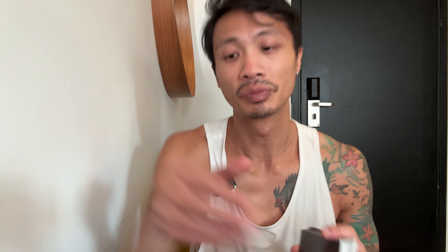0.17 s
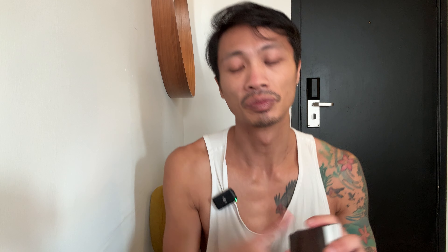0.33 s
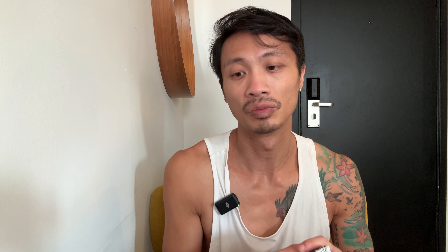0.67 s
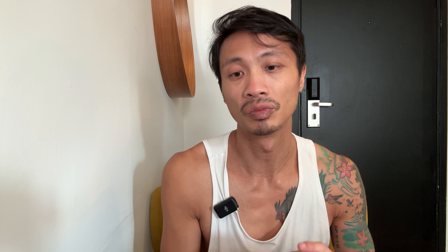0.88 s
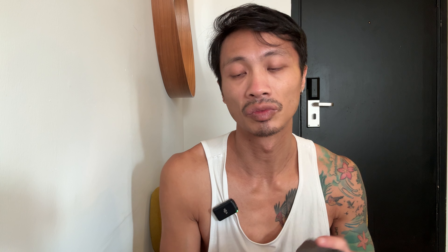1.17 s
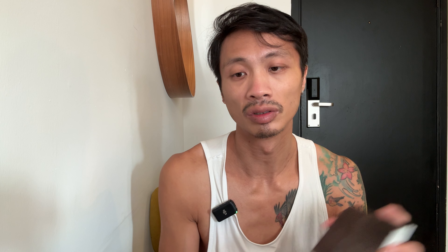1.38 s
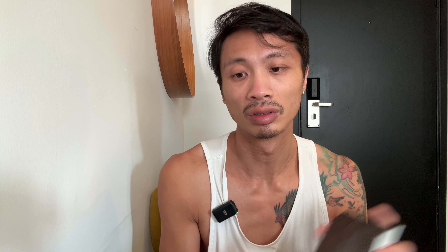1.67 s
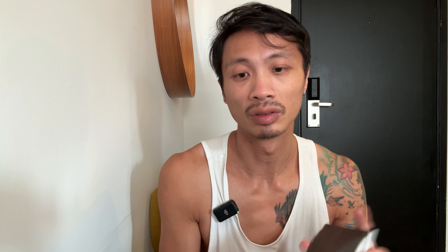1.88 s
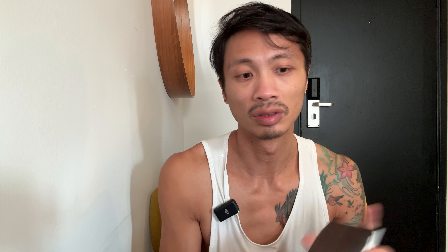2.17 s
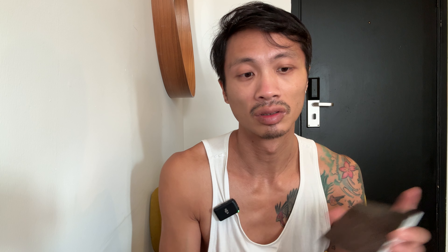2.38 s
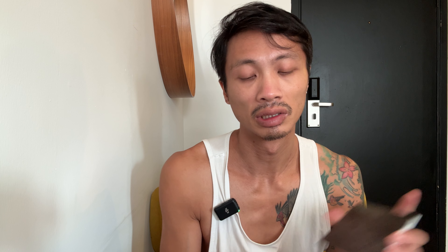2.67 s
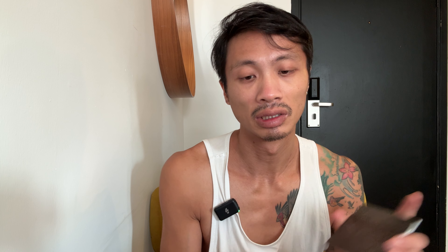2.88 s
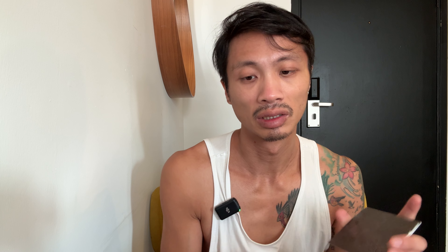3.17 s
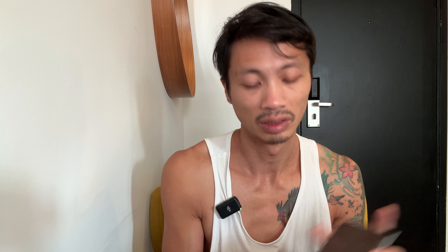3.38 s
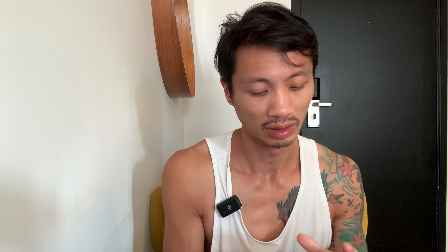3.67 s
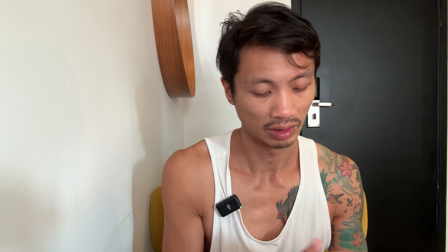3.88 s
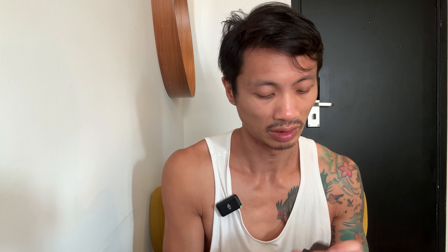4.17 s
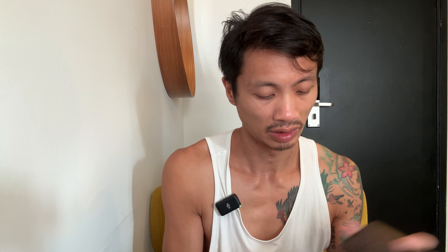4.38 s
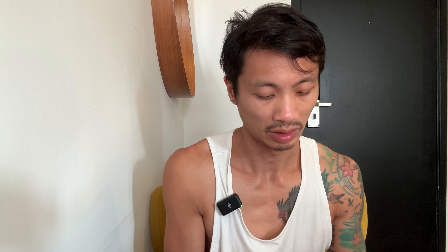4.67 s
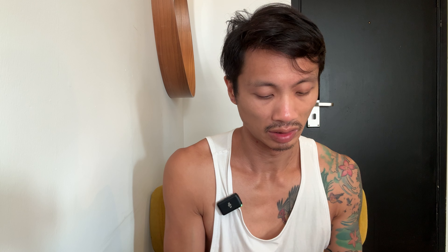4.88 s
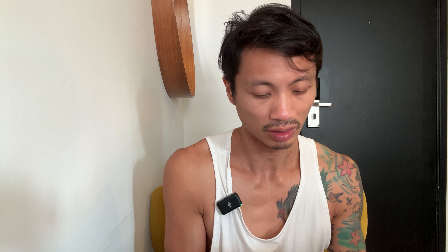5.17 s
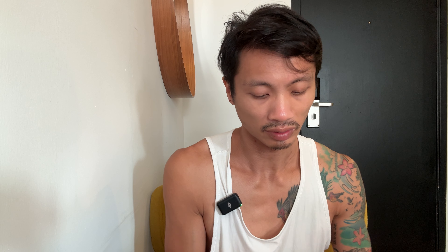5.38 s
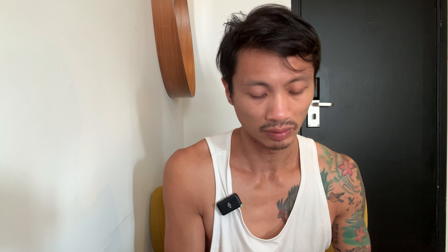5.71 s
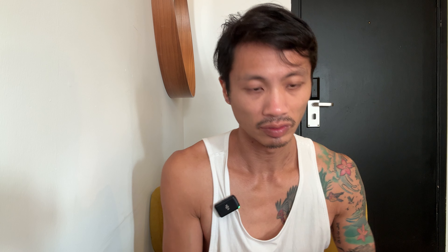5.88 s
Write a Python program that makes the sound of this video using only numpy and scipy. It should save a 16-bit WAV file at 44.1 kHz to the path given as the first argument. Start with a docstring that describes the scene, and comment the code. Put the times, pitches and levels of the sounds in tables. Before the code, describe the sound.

Playing cards rustle, slide and slap in a regular hand shuffle, pause, then crack sharply twice close by, with faint room hum underneath.

```python
"""A small quiet room, where a deck of stiff cards is picked up and shuffled from hand to hand.
Packets slide over each other with a papery hiss, made of filtered friction noise, and slap onto the deck.
Each slap is a puff of air, a ring of a few milliseconds from damped bending modes, and an edge tick.
A soft low bump comes first and two hard snaps near the end, over faint air noise, a hum and thin whines.
Near surfaces echo the snaps and slides, and a short diffuse tail follows them."""
import sys
import numpy as np
from scipy import signal
from scipy.fft import rfft, irfft
from scipy.io import wavfile
from scipy.ndimage import uniform_filter1d

SR = 44100
rng = np.random.default_rng(int(sys.argv[2]) if len(sys.argv) > 2 else 0)


def digitize_waveform(pressure):
    """Quantize a signal to 16-bit integers and store it at the path in sys.argv[1].

    Rows of a 2-D input are taken as channels; values are limited to [-1, 1].
    """
    field = np.atleast_2d(pressure).T
    bounded = np.clip(field, -1, 1)
    quanta = np.round(bounded * 32767).astype(np.int16)
    wavfile.write(sys.argv[1], SR, quanta)


N = 266540

# Shuffle strokes, each a packet peeled off the deck. Each row: start in seconds, length in seconds,
# edge hiss in dB, growth of the hiss over the stroke in dB, face rasp in dB before the overall rasp gain,
# resonance of the rubbed card in Hz.
STROKES = [(1.644, 0.074, -53.5, 3, -46.5, 2480), (1.952, 0.077, -51, 5, -47, 3100),
           (2.25, .056, -45.5, 6, -43, 1890), (2.54, 0.068, -49.5, -7, -50.5, 2100),
           (2.813, 0.073, -44.5, 0, -50, 3060), (3.096, 0.063, -47.5, -6, -49.5, 3055),
           (3.356, .072, -45, -8, -48.5, 1600), (3.632, .058, -69, -4, -55, 2470),
           (4.614, 0.04, -58, -13, -49.5, 2310)]


def amp(db):
    """The decibel law: 20 dB is a factor of ten in amplitude."""
    return 10 ** (np.asarray(db) / 20)


def evened(x):
    """Normalisation by mean power: scales to rms 1."""
    return x / np.sqrt(np.mean(x ** 2) + 1e-20)


def unit(x):
    """Normalisation by total energy: scales to energy 1."""
    return x / (np.linalg.norm(x) + 1e-12)


def read(points, hz):
    """Interpolation on a log-frequency axis, close to how pitch is heard."""
    f, value = np.transpose(points)
    return np.interp(np.log(hz + 1), np.log(f + 1), value)


def add(mix, s, sound):
    """Superposition: adds a sound to the mix in place from time s."""
    part = mix[max(round(s * SR), 0):][:len(sound)]
    part += sound[:len(part)]


def causal(points, size=2048):
    """Minimum phase: the Hilbert transform of the log spectrum gives the most compact causal response."""
    log_gain = np.log(amp(read(points, abs(np.fft.fftfreq(size, 1 / SR)))))
    spectrum = np.exp(np.conj(signal.hilbert(log_gain)))
    return np.fft.ifft(spectrum).real[:size // 2]


def through(x, response):
    """Linear filtering: convolves with an impulse response and keeps the length."""
    return signal.fftconvolve(x, response)[:len(x)]


def wander(per_s):
    """Low-passed noise: a smooth random course of rms 1 that changes about per_s times a second."""
    size = max(int(SR / per_s), 1)
    return evened(uniform_filter1d(uniform_filter1d(rng.standard_normal(N), size), size))


def air(noise_db=-56.5, hum_hz=141.5, hum_db=-62.0):
    """Stationary noise shaped by its spectrum, with a faint hum under random amplitude modulation."""
    # Spectrum of the background. Each row: frequency in Hz, relative level in dB.
    air_colour = [(15, -42), (25, -14.5), (40, -6), (62, -11), (105, -7), (160, -5.5), (240, -7),
                  (420, -17.5), (750, -20), (1170, -21.5), (1900, -36.5), (2900, -38), (5000, -46),
                  (8000, -47), (11000, -44.5), (16000, -50)]
    gain = amp(read(air_colour, np.fft.rfftfreq(N, 1 / SR)))
    noise = evened(irfft(rfft(rng.standard_normal(N)) * gain, N))
    hum = wander(5) * np.sin(2 * np.pi * hum_hz * np.arange(N) / SR)
    return amp(noise_db) * noise + amp(hum_db) * hum


def whines(waver=.012, blur_hz=300.):
    """Frequency modulation: thin high tones waver slowly, blur quickly, and fade in and out."""
    # Faint background tones. Each row: start in seconds, end in seconds, centre frequency in Hz, level in dB.
    whine_rows = [(0, 0.27, 4730, -78), (0.302, 1.3, 10960, -87), (3.931, 4.219, 11500, -88)]
    out = np.zeros(N)
    for start, end, hz, db in whine_rows:
        size = int((end - start) * SR)
        frequency = hz * (1 + waver * wander(18)) + blur_hz * wander(2500)
        turns = np.cumsum(frequency[:size]) / SR
        tone = signal.windows.tukey(size, .5) * np.sin(2 * np.pi * turns)
        add(out, start, amp(db) * evened(tone))
    return out


def friction(colour, grains_per_s, grain_share, uneven_db):
    """Stick-slip of paper fibres: a smooth rub plus tiny random clicks, under uneven pressure."""
    clicks = (rng.random(N) < grains_per_s / SR) * rng.standard_normal(N)
    rub = rng.standard_normal(N) + grain_share * evened(clicks)
    rub *= amp(uneven_db * wander(220))
    return evened(through(rub, causal(colour)))


def scrapes(t, swell_db=15, roundness=1.3):
    """Friction grows with speed: each scrape swells and dies away, as (hiss, rasp, resonance)."""
    # Loose scrapes as the cards are gathered and squared. Each row: peak time, rise and fall in seconds,
    # edge hiss in dB, face rasp in dB before the overall rasp gain, resonance of the rubbed card in Hz.
    scrape_rows = [(.135, .08, .12, -64, -66, 3380), (.535, 0.0059, .075, -58.5, -58, 1199),
                   (1.165, .07, .06, -74, -64, 1153), (1.293, .06, .045, -65, -53, 1240),
                   (1.355, .07, 0.016, -48.5, -59, 1248), (1.828, .008, .045, -65, -60, 1247),
                   (3.275, .012, .085, -69, -58, 3160), (3.962, .028, 0.025, -57, -56, 2617),
                   (4.25, .08, .17, -63.5, -65, 2600), (4.38, .08, .02, -50, -57.5, 2193),
                   (4.94, .03, 0.047, -65, -65, 1163), (5.13, .04, .06, -49.5, -55.5, 1740),
                   (5.322, .009, .006, -35, -36, 3900), (5.497, 0.019, 0.032, -90, -66, 530),
                   (5.895, .14, .028, -59, -60, 3500), (5.99, 0.083, .05, -73, -64, 1164)]
    for peak, rise, fall, hiss_db, rasp_db, hz in scrape_rows:
        away = np.clip(np.maximum((peak - t) / rise, (t - peak) / fall), 0, 6)
        speed = amp(-swell_db * away ** roundness)  # roundness: 1 is a pointed peak, 2 a rounded one
        yield speed * amp(hiss_db), speed * amp(rasp_db), hz


def strokes(t, rise_s=0.0044, fall_s=.01, rasp_growth_db=-4.0):
    """Sliding contact: a packet brushes in, slides and drops clear, as (hiss, rasp, resonance)."""
    approach_hiss_db, approach_rasp_db, approach_db_per_s = -59.5, -63, 379.5
    for start, length, hiss_db, growth_db, rasp_db, hz in STROKES:
        rise = np.clip((t - start) / rise_s + 1, 0, 1)
        fall = np.clip((start + length - t) / fall_s + 1, 0, 1)
        moving = rise * fall
        travel = np.clip((t - start) / length, 0, 1) - .5
        approach = (t < start) * amp(-approach_db_per_s * abs(start - t))
        hiss = moving * amp(hiss_db + growth_db * travel) + approach * amp(approach_hiss_db)
        rasp = moving * amp(rasp_db + rasp_growth_db * travel) + approach * amp(approach_rasp_db)
        yield hiss, rasp, hz


def slides(rasp_db=-2.5, sing_db=-2.0, sing_tilt=2.04, ring_cycles=2.9, pressure_db=1.78):
    """Friction-driven resonance: edges hiss, faces rasp and sing, and fingers rustle throughout."""
    # Spectra of rubbed edges and rubbed faces. Each row: frequency in Hz, relative level in dB.
    hiss_colour = [(1500, -30.5), (4000, -11.5), (6500, -7.5), (8500, -2), (10500, -1.5), (13000, 0.5),
                   (15500, 0)]
    rasp_colour = [(120, -16.5), (480, -1), (750, -5.5), (1600, 0), (2400, -0.5), (3600, -2), (5000, -4.5),
                   (7500, -10.5), (14000, -25.5)]
    t = np.arange(N) / SR
    hiss, rasp, pitch = np.zeros(N), np.zeros(N), np.full(N, 1200.)
    for edge, face, hz in [*strokes(t), *scrapes(t)]:
        pitch[face > rasp] = hz  # the card rubbed hardest sets the resonance
        hiss, rasp = np.maximum(hiss, edge), np.maximum(rasp, face)

    grip = amp(-78.5 + 2 * wander(4.3))  # the fingers keep shifting, with a slow drift in dB
    rustle = friction(hiss_colour, 300, .45, 2.2) + amp(2.5) * friction(rasp_colour, 90, 0.27, 1.2)
    fingers = grip * rustle
    edges = hiss * friction(hiss_colour, 1300, 0.61, 1.3)

    # rubbing keeps one broad resonance of the card sounding, the lower the stronger
    turns = np.cumsum(pitch) / SR
    knots = np.arange(0, turns[-1], ring_cycles)  # the swing is renewed every few cycles
    swing = np.interp(turns, knots, rng.standard_normal((len(knots), 2)) @ [1, 1j])
    sing = evened((swing * np.exp(2j * np.pi * turns)).real)
    sing_gain = amp(sing_db) * (1200 / pitch) ** sing_tilt
    faces = rasp * (amp(rasp_db) * friction(rasp_colour, 500, 0.63, 2.4) + sing_gain * sing)
    return (edges + faces + fingers) * amp(pressure_db * wander(60))  # the hand presses unevenly


def bump(s=.1025, hz=90.0, db=-30.0, t60=0.061, linger_db=-37.5, linger_t60=0.34):
    """Two-rate exponential decay: an arm knocks softly on the furniture, a low thud that lingers."""
    out, t = np.zeros(N), np.arange(SR // 2) / SR
    decay = amp(db - 60 * t / t60) + amp(linger_db - 60 * t / linger_t60)
    onset = 1 - np.exp(-t / 0.0019)
    add(out, s, decay * onset * np.sin(2 * np.pi * hz * t))
    return out


def contact(t, t60, chatter):
    """Impulsive excitation: one clean impact, then the chatter of other cards landing just behind it."""
    x = chatter * unit(rng.standard_normal(len(t)) * amp(-60 * t / t60))
    x[0] += 1
    return x


def card_modes(t, hz, t60, flex_s=0.00011):
    """Modal synthesis: the bending modes of a held card ring together and decay."""
    # Bending modes. Each row: factor on the ring pitch, relative level in dB, factor on the t60.
    mode_rows = [(.7, 0, 0.57), (.94, 4, 1.66), (1.078, -2, 1.75), (1.4, -0.5, 0.73), (1.65, -12.5, 0.82)]
    modes = np.zeros(len(t))
    for ratio, db, life in mode_rows:
        mode_hz = hz * ratio * rng.uniform(0.923, 1.04)  # the grip changes and detunes the modes
        modes += amp(db - 60 * t / (t60 * life)) * np.sin(2 * np.pi * (mode_hz * t + rng.random()))
    return modes * (1 - np.exp(-t / flex_s))  # the card takes a moment to flex


def snaps(blows, mode_share=0.43, cavity_share=0.32, cavity_t60=0.0092, low_cut_hz=56.0):
    """Impact radiation: each slap squeezes out air, bends a card into a brief ring and ticks at its edge."""
    # Spectra of the air push, the card ring and the edge tick. Each row: frequency in Hz, relative level in dB.
    push_points = [(25, -26.5), (70, -10), (150, -7), (300, -4.5), (500, 1.5), (750, -3.5), (1200, -7),
                   (2500, -32)]
    ring_points = [(300, -33.5), (700, -1), (1050, -0.5), (1800, 2), (2400, -0.5), (3600, -2), (4600, -7.5),
                   (7000, -15.5), (14000, -39.5)]
    tick_points = [(1500, -32), (4000, -7), (5200, 2), (6500, -4), (8200, -1), (10000, 0.5), (12500, -4),
                   (15500, -2.5)]
    push_colour, ring_colour, tick_colour = causal(push_points), causal(ring_points), causal(tick_points)
    ring_t60_s, tight_db = 0.023, -19.5  # near tight_db the blow presses the card down and chokes the ring
    cavity_hz, puff_db, cavity_oct_per_db = 703, -34, 0.06  # cavity_hz is the pitch for a puff of puff_db
    blow_s = .005  # levels are rms over this length
    out, t = np.zeros(N), np.arange(2048) / SR
    for s, push_db, ring_db, tick_db, hz in blows:
        free = 1 / (1 + amp(ring_db - tight_db) ** 2)  # a hard, tight blow rings and chatters least
        t60 = ring_t60_s * free

        # the hollow of the hand gives the puff a dull pitch; bigger puffs come from a wider, deeper hollow
        push_hz = cavity_hz * 2 ** (cavity_oct_per_db * (puff_db - push_db))
        cavity = amp(-60 * t / cavity_t60) * np.sin(2 * np.pi * push_hz * t)
        puff = through(contact(t, 0.02, chatter=0.9 * free), push_colour)
        push = cavity_share * unit(cavity) + (1 - cavity_share) * unit(puff)

        clack = through(contact(t, t60, chatter=2.46 * free), ring_colour)
        ring = mode_share * unit(card_modes(t, hz, t60)) + (1 - mode_share) * unit(clack)
        tick = through(contact(t, t60, chatter=1.4 * free), tick_colour)
        blow = amp(push_db) * unit(push) + amp(ring_db) * unit(ring) + amp(tick_db) * unit(tick)
        add(out, s, np.sqrt(blow_s * SR) * blow)
    # small cards radiate no deep bass
    return signal.sosfilt(signal.butter(2, low_cut_hz, "high", fs=SR, output="sos"), out)


def flicks(per_s=45, level_db=1.5, spread_db=1.5, push_db=-4, tick_db=-5):
    """A random point process: single cards slip off during each stroke, as rows for snaps()."""
    rows = []
    for start, length, _, _, rasp_db, hz in STROKES:
        times = np.cumsum(rng.uniform(.3, 1.7, 8) / per_s)
        ring_levels = rasp_db + level_db + spread_db * rng.standard_normal(8)
        for after, db in zip(times, ring_levels):
            if after < length:
                rows.append((start + after, db + push_db, db, db + tick_db, hz))  # push and tick follow the ring
    return rows


def walls(x):
    """Specular reflection: the direct sound and the single echoes from near surfaces."""
    # Early reflections. Each row: delay in seconds, gain as a factor at low frequencies.
    echo_rows = [(.0012, 0.13), (.0031, 0.11), (.0089, 0.095), (0.0106, 0.033), (0.0168, .06),
                 (.0248, 0.055)]
    response = np.zeros(SR // 20)
    response[0] = 1
    for delay, gain in echo_rows:
        add(response, delay, gain * np.array([1, 2, 1]) / 4)  # each bounce dulls the treble
    return through(x, response)


def tail(x, wet_db=-14.0, build_s=0.0091):
    """Diffuse reverberation: noise that builds up, then decays at a rate set by frequency."""
    # Room decay. Each row: frequency in Hz, t60 in seconds.
    room_decay = [(150, 0.26), (600, 0.25), (2000, 0.31), (4500, 0.34), (9000, 0.34), (16000, 0.27)]
    t = np.arange(SR // 2) / SR
    hz, when, z = signal.stft(rng.standard_normal(len(t)), SR, nperseg=256)
    fading = z * amp(-60 * when / read(room_decay, hz)[:, None])
    decay = signal.istft(fading, SR, nperseg=256)[1][:len(t)]
    response = amp(wet_db) * unit(decay * (1 - np.exp(-(t / build_s) ** 2)))
    tint = causal([(200, 1.0), (2500, 0.5), (5000, 2.0), (9000, -3.0), (16000, -4.5)])  # Hz, dB
    return through(x, through(response, tint))


def scene(count=3):
    """Directivity: cards radiate differently each way, so several versions of every snap feed the room."""
    # Slaps and snaps. Each row: time in seconds, push of trapped air in dB, card ring in dB, edge tick in dB,
    # ring pitch in Hz before the modes are detuned.
    snap_rows = [(1.392, -55, -47.5, -67, 1560), (1.6448, -62, -29, -33, 1930),
                 (1.6959, -65, -40.5, -52, 2530), (1.9292, -47, -44.5, -57, 1590),
                 (1.9517, -41, -22.5, -33.5, 2610), (1.9842, -43, -43, -50, 2160),
                 (2.0627, -57, -52, -62, 1104), (2.2273, -47, -42.5, -60, 1993),
                 (2.236, -43, -27, -33.5, 2403), (2.2588, -36.5, -30, -36, 1987),
                 (2.5595, -51, -50, -47, 1793), (2.593, -41, -44, -49, 1765),
                 (2.604, -42, -53, -45.5, 1147), (2.8138, -68, -37, -37, 1710),
                 (2.863, -44, -46.5, -44, 1544), (2.8912, -45.5, -45.5, -60, 1386),
                 (3.0885, -55, -49, -53, 2230), (3.0946, -55, -39, -37, 2400),
                 (3.1307, -41, -39.5, -43.5, 1383), (3.354, -39, -35, -49, 1293),
                 (3.4197, -35, -29.5, -37.5, 1520), (3.624, -36, -30, -36, 1450),
                 (3.664, -41, -40, -48.5, 2500), (3.786, -69, -58.5, -55.5, 3387),
                 (4.3935, -40.5, -37.5, -44, 2100), (4.6094, -41.5, -41, -47.5, 2297),
                 (4.6179, -47, -30, -42, 2590), (4.6264, -61, -35.5, -41.5, 2770),
                 (4.6531, -33.5, -34.5, -50, 1600), (4.6677, -64, -38, -49.5, 2180),
                 (5.187, -31, -37, -45, 1190), (5.2846, -31, -25.5, -35.5, 1510),
                 (5.2916, -31.5, -18.5, -22.5, 2990), (5.3263, -23.5, -20, -21, 1100),
                 (5.3356, -43, -32, -48, 4150), (5.969, -56, -57.5, -61, 1195)]
    rubbing, blows = slides(), snap_rows + flicks()
    snap_tails = sum(tail(snaps(blows)) for _ in range(count)) / np.sqrt(count)
    diffuse = tail(rubbing) + snap_tails
    near = walls(snaps(blows) + rubbing)
    return (near + diffuse + bump() + whines() + air())[None]


def record(dry, edge_hz=16350):
    """Band limiting: a linear-phase low-pass removes the highest treble."""
    low_pass = signal.firwin(255, edge_hz, window=("kaiser", 8), fs=SR)
    return signal.oaconvolve(dry, low_pass[None], "same")


dry = scene()
out = record(dry)
digitize_waveform(out)
```